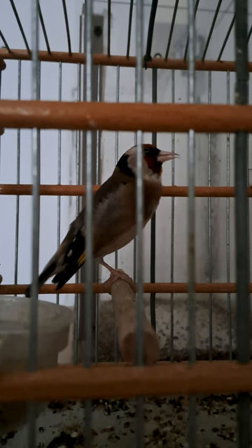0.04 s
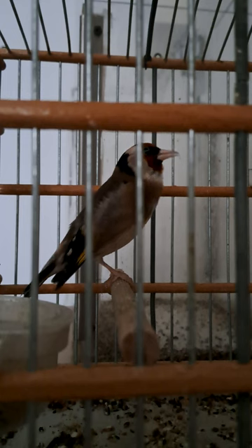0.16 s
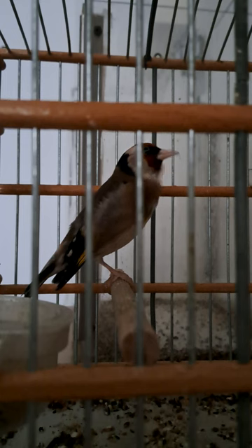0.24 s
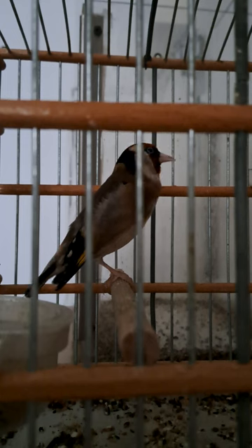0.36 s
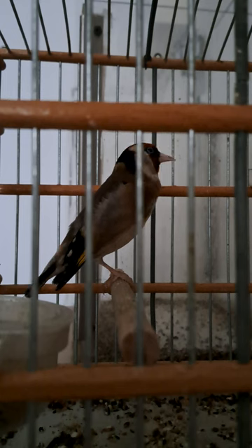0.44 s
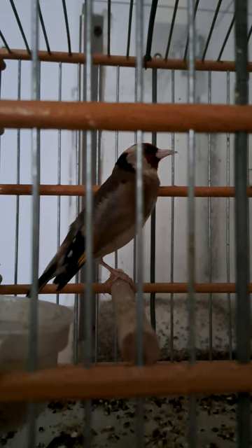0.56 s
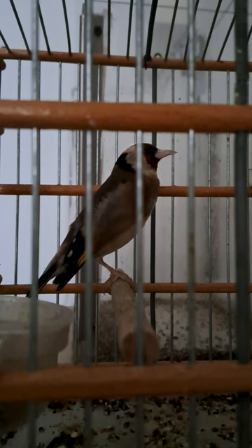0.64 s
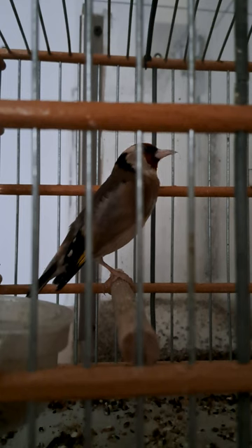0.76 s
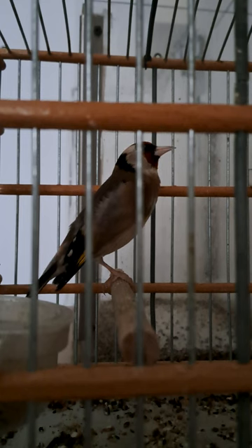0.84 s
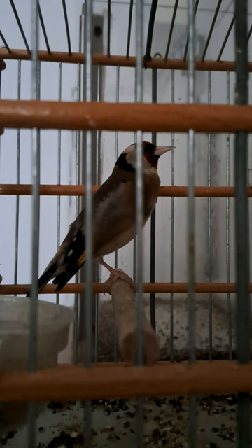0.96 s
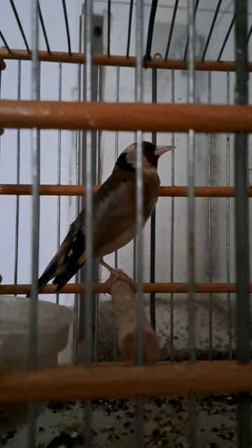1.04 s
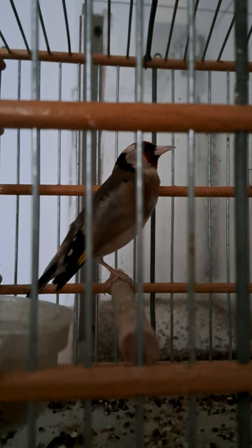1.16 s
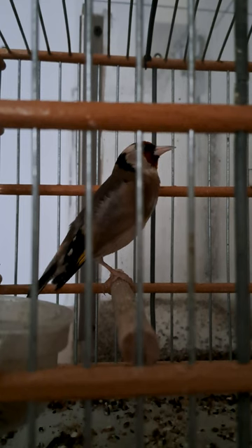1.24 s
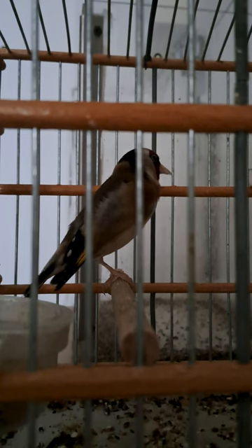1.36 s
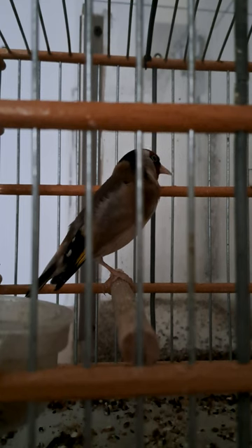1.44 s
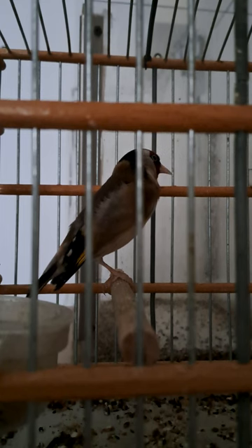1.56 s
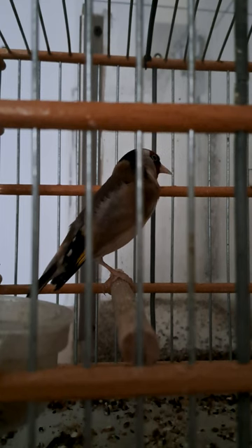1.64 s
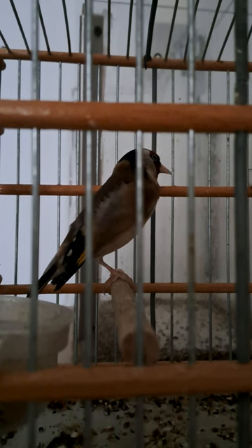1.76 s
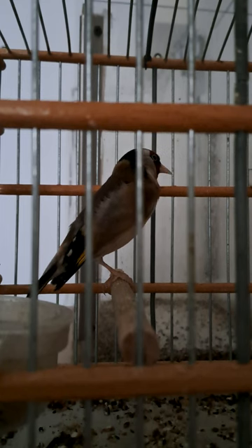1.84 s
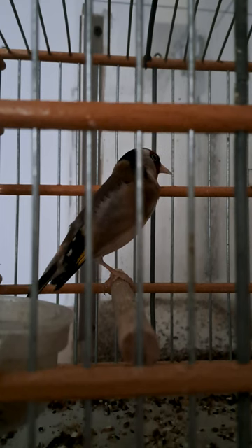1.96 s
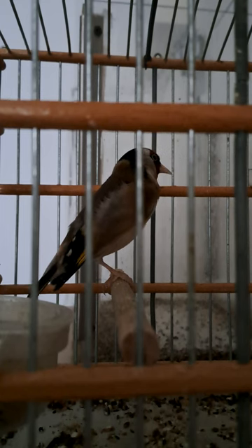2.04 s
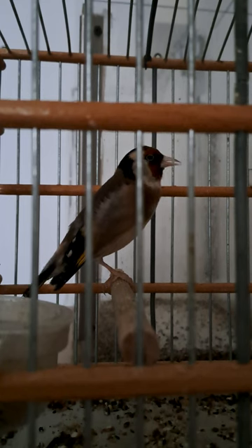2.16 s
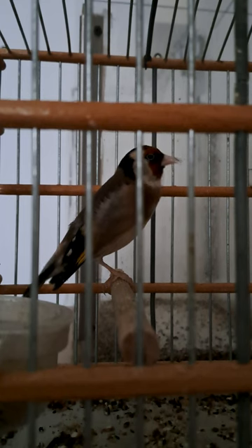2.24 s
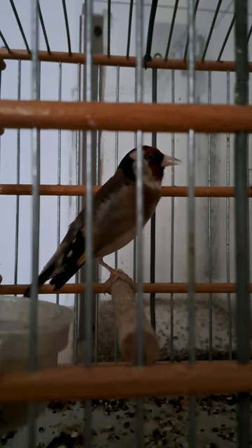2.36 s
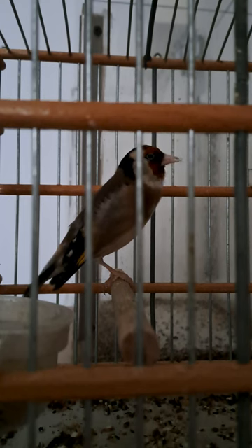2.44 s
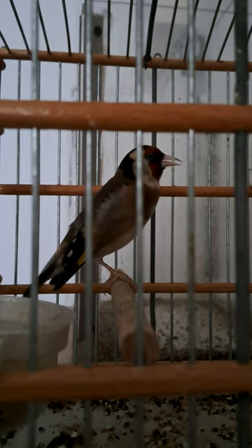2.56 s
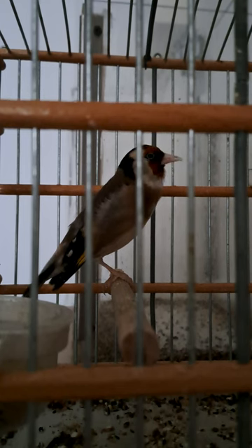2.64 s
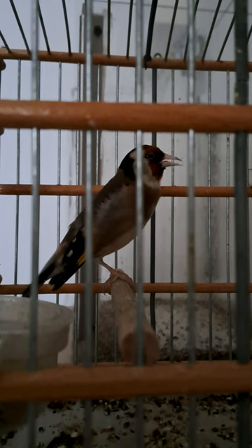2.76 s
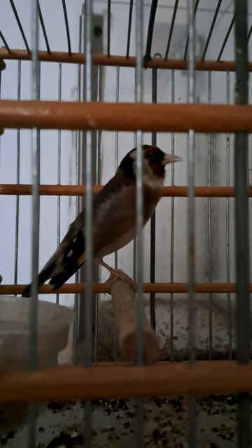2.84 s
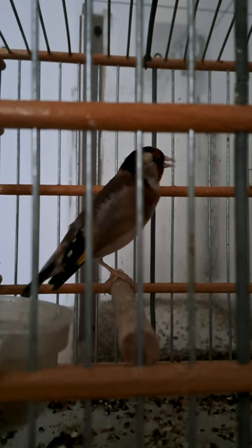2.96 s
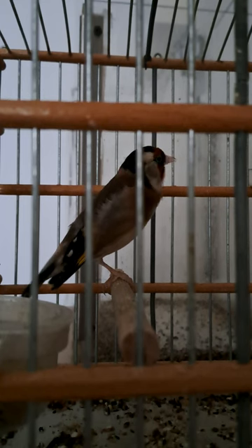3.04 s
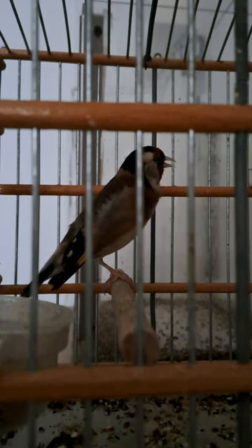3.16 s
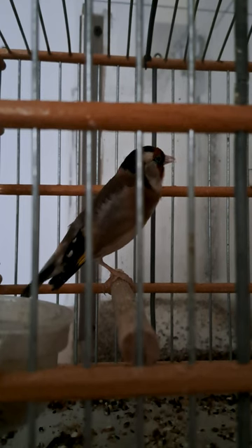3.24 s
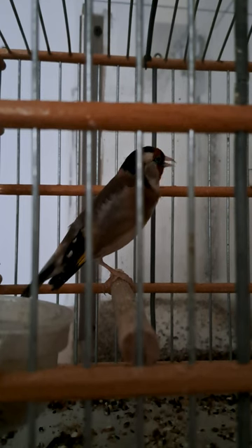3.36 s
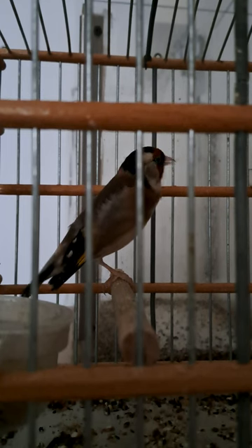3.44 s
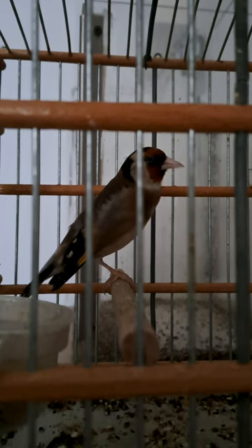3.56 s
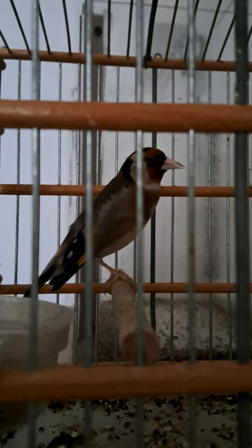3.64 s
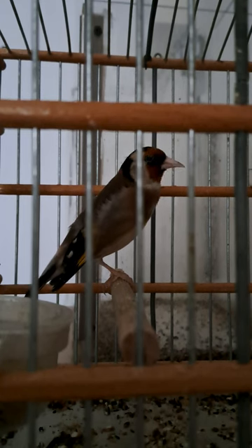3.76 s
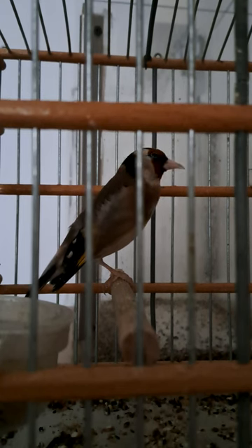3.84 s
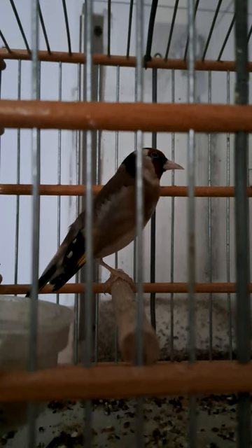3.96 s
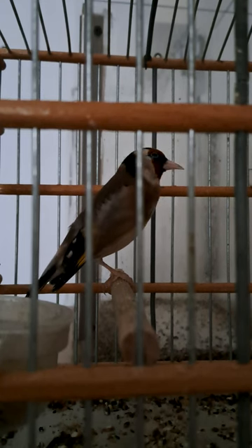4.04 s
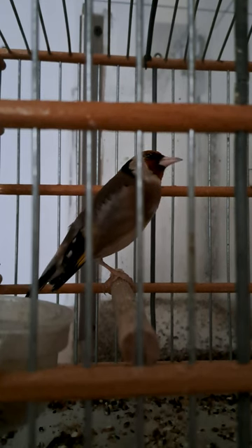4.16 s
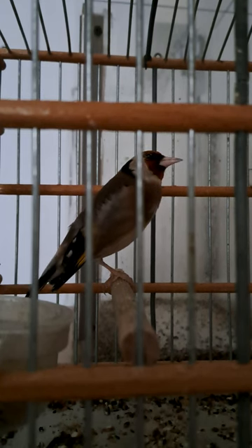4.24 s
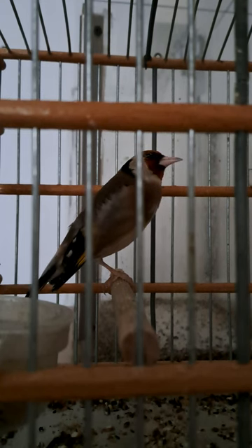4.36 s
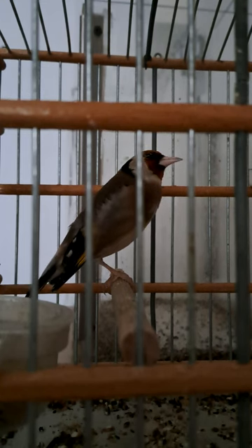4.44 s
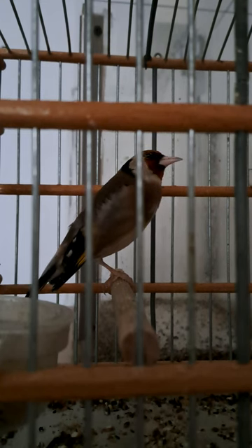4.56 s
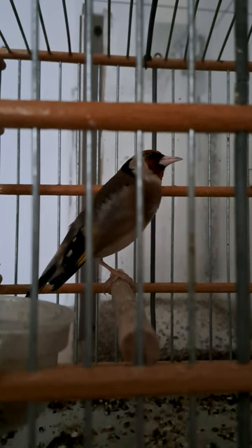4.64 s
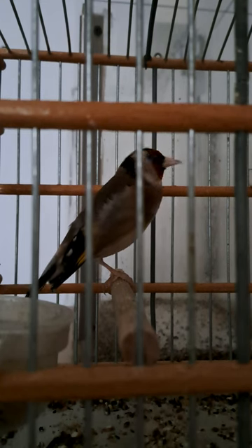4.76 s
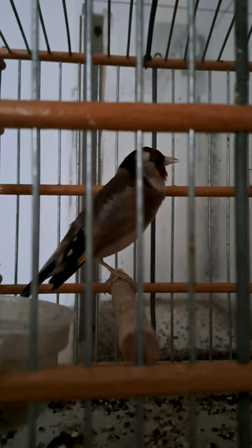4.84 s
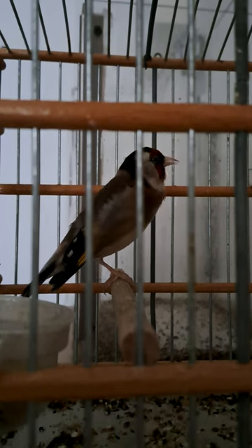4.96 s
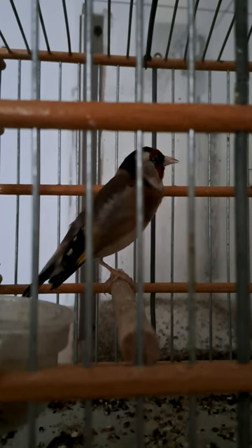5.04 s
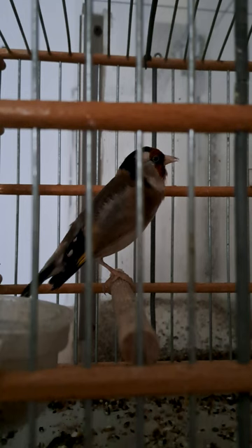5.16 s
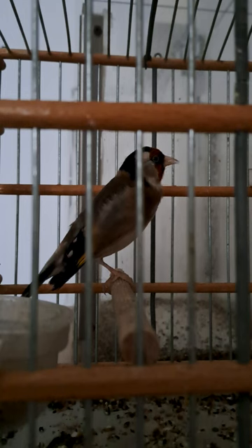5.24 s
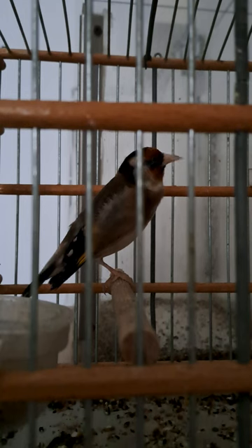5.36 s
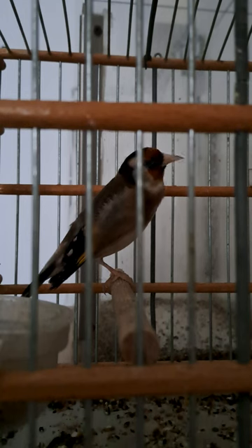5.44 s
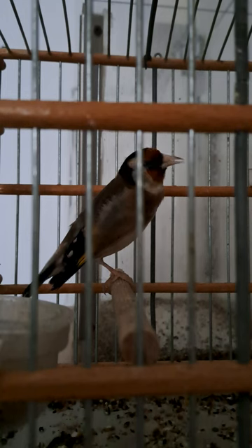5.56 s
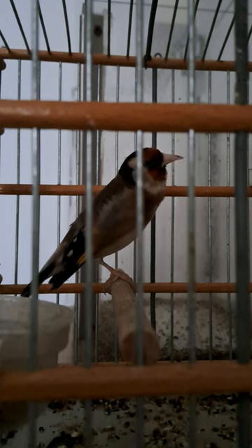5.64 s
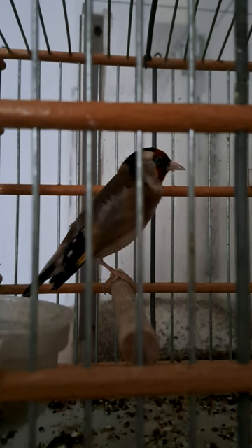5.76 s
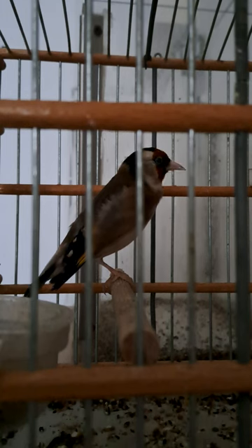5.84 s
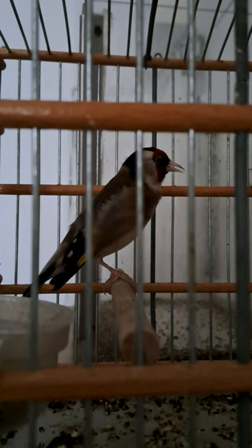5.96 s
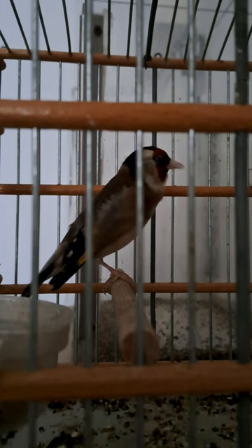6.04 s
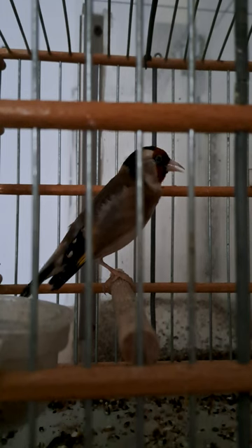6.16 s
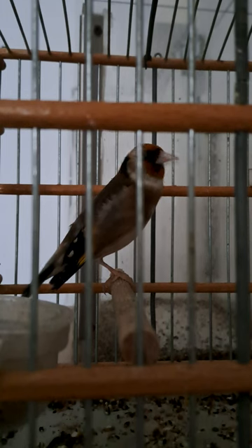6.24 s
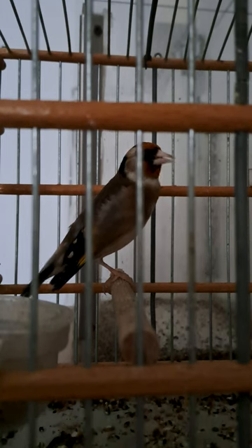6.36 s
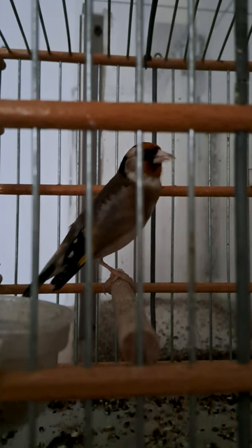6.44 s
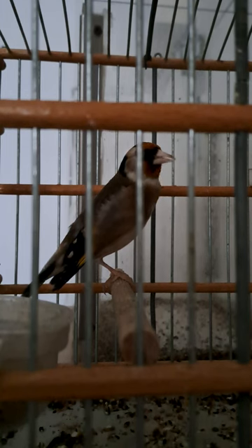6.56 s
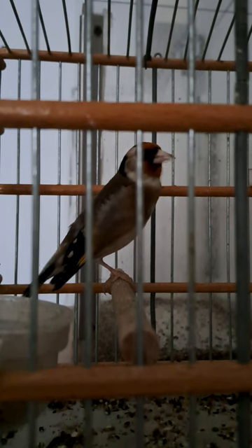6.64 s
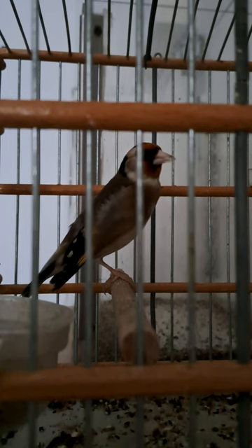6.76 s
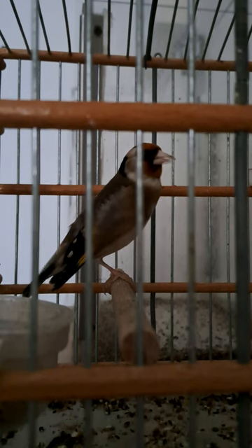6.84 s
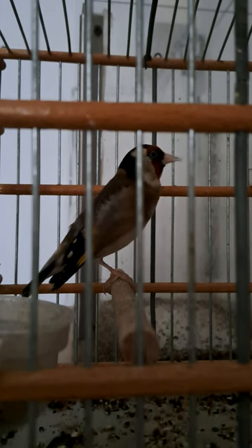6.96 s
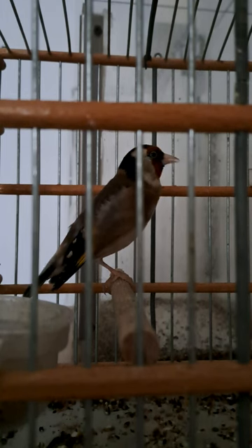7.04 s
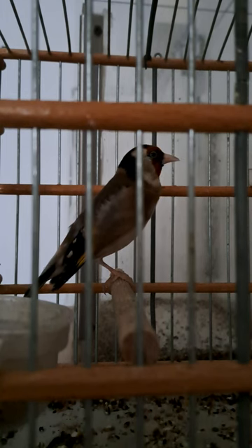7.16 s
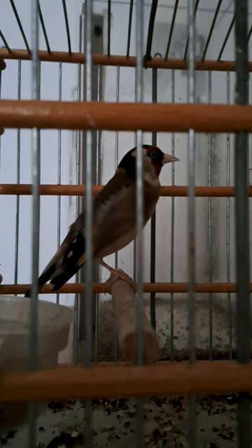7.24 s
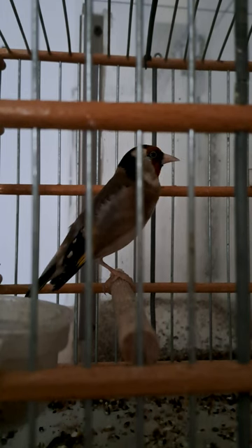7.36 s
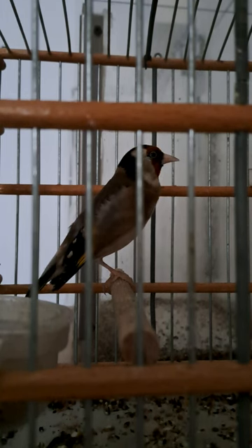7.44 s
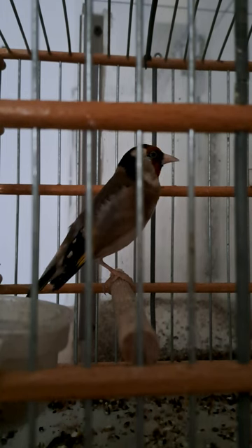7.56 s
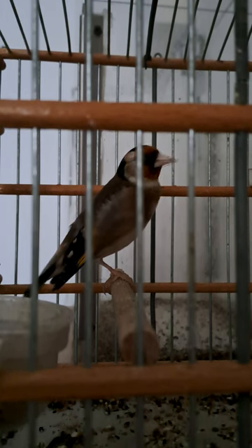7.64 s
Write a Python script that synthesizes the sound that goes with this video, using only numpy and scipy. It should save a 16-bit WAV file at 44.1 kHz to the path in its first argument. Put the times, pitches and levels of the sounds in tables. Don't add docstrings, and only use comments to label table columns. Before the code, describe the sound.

A small goldfinch in a cage sings close to a stereo microphone in a hard, echoing room. Two quick twittering syllables open, then a pause with a faint call, a loud rising call and a fast high-low trill ending in a thin squeak. After another pause the pattern returns more compactly, with distant scuffing and a knock underneath.

```python
import sys
import numpy as np
from scipy import signal
from scipy.fft import rfft, irfft
from scipy.io import wavfile
from scipy.ndimage import uniform_filter1d, minimum_filter1d, map_coordinates

SR = 44100
rng = np.random.default_rng(int(sys.argv[2]) if len(sys.argv) > 2 else 0)


def volts(x):
    e = np.asarray(x, float) / 20
    return 10 ** e


def wav_out(sig):
    wavfile.write(sys.argv[1], SR, np.round(np.clip(np.atleast_2d(sig).T, -1, 1) * 32767).astype(np.int16))


N = 340008
PRE = SR // 5
LAG = 7


def score():
    # [s, Hz, dB, dB, dB]
    openers = [
        (-.065, 3290, -3, -25, -16.5),
        (.255, 3314, 1, -19.5, -15.5),
        (4.901, 3314, 2, -26.5, -18.5),
        (5.233, 3299, 0.5, -18.5, -17),
    ]
    # [s, Hz, dB, dB, dB]
    twits = [(0.063, 5183, 0, -29, -6), (.371, 5278, 0, -32, -8), (5.016, 5213, -1.2987, -30.5, -6.5),
             (5.344, 5200, 2, -34, -9.5)]
    # [s, Hz, dB, dB, dB]
    chirps = [(2.367, 6105, -1.1, -14, -9.5), (2.532, 6092, 1.5, -16, -18)]
    # [s, Hz, dB, dB, dB]
    trill_top = [(2.641, 5032, -1, -16, -5.5), (2.844, 5033, -1.5, -13, -5.5),
                 (3.044, 5018, 2.2814, -15.5, -6.5), (3.245, 5009, 2, -15.5, -7.5),
                 (3.449, 4976, 4.5, -18, -9), (6.045, 5065, -2.2752, -17, -7),
                 (6.251, 5007, 1.8087, -18, -8), (6.455, 5010, -2, -14, -7),
                 (6.661, 4919, -3.0649, -13.5, -7), (6.865, 4947, -2.5, -15, -7)]
    # [s, Hz, dB, dB, dB]
    trill_bottom = [(2.746, 4242, -0.41, -12.5, -4), (2.945, 4248, -1.2, -11.5, -5),
                    (3.148, 4195, 1.7, -12.5, -8), (3.348, 4155, 1.5, -14, -9.5),
                    (5.74, 4218, 0.94, -17, -11.5), (6.147, 4254, 0.58, -15.5, -10.5),
                    (6.352, 4234, 1.3, -13, -9.5), (6.557, 4193, 1.5, -15.5, -12),
                    (6.762, 4180, 0.43, -14, -10.5)]
    # [s, Hz, dB, dB, dB]
    closers = [
        (3.568, 3934, 0, -25.5, -12.5),
        (6.977, 3949, 0.00095, -26.5, -14.5),
    ]
    # [s, Hz, dB, dB, dB]
    shrieks = [
        (3.673, 7147, .7, -15.5, -21.5),
        (7.08, 7331, -.7, -15.5, -21),
    ]
    # [s, Hz, dB, dB, dB]
    wisps = [
        (1.385, 4363, 0.0038, -34.5, -19.5),
        (2.2, 4417, 0.000536, -29, -20.5),
        (5.58, 4314, 0, -22.5, -16),
    ]
    # [s, Hz, dB, dB, dB]
    rings = [
        (2.243, 5296, 0, -32, -7.5),
        (5.623, 5230, 0.33, -28.5, -4),
    ]
    # [s, Hz, dB, dB]
    undertones = [(.085, 2113, 0, -47), (.395, 2132, -0.5, -44), (2.575, 2282, 3, -39),
                  (5.035, 2092, -2, -44.5), (5.365, 2074, -1, -49.5)]
    # [s, Hz, dB, dB]
    drops = [(.107, 4057, -2.012, -8), (.418, 4028, -0.982, -9.5), (5.062, 4034, 1.756, -10),
             (5.392, 4042, -1.795, -9.5)]
    return [
        (("lead", "buzz"), .033, openers),
        (("tick", "pip"), 0.017183, twits),
        (("drop",), 0, drops),
        (("under",), 0, undertones),
        (("fall", "step"), .036, wisps),
        (("twin", "lift"), 0.0036, [(1.429, 5206, 0.013, -27.5, -20.5)]),
        (("twin", "rise"), 0.0011, rings),
        (("buzz", "flick"), .043, chirps),
        (("mid",), 0, [(2.441, 4139, -1.5, -14.5)]),
        (("dip",), 0, [(2.463, 4773, 3.379, -10.5)]),
        (("high", "dip"), .039, trill_top),
        (("low", "mid"), .037, trill_bottom),
        (("sag", "climb"), .036, closers),
        (("shriek", "squeal"), 0.0038, shrieks),
    ]


def finch():
    # start pitch in Hz, usual final pitch in Hz, glide and length in seconds.
    slides = dict(lead=(3700, 4550, 0.0047, 0.021), buzz=(2694.8, 3300, .02, 0.038631),
              tick=(6550, 6450, 0.01, 0.025), pip=(5400, 5230, 0.021, 0.030847),
              drop=(3850, 4040, 0.0049, 0.021773), fall=(8700, 6248.3, .028, 0.04),
              step=(3850, 4300, 0.015, 0.017), rise=(4500, 5250, 0.025, .074),
              lift=(4600, 5200, .025, .048), twin=(3600, 3328.6, 0.011, 0.018),
              flick=(4950, 5770, .01, 0.025), high=(6700, 6410.1, .034, .034),
              dip=(6287.1, 5050, .017, 0.036445), low=(2697.5, 3280, .012, 0.03),
              mid=(3829.2, 4200, .013, 0.025107), sag=(3450, 2650, .018, .022),
              climb=(2800, 4000, .03, .034), shriek=(4750, 5850, 0.02, 0.03),
              squeal=(4700, 7200, 0.011, 0.033), under=(2200, 1500, 0.020444, 0.034))
    # rise and fall as shares of length, left-right in dB, room send in dB.
    throws = dict(lead=(.5, .5, -6.5, 4), buzz=(0.46494, 0.1455, -2.2, 0.9078),
              tick=(0.3915, 1.0115, -12, 1.0081), pip=(.5, 0.2318, -7.5, -1),
              drop=(0.355, 0.7747, -3.5, 2.5), fall=(0.7775, 0.6748, -9.5, 1.5),
              step=(.5, 0.2812, -6.5, 4.5), rise=(0.6511, 0.495, -9.5, -4),
              lift=(0.4144, 0.069, -11.5, 8.5), twin=(0.25, 0.46, 5.1, 2.3),
              flick=(0.6448, 0.5841, -15.5, -1), high=(1.1868, 0.3717, -14, 2), dip=(0.4099, 0.4567, -8, 0),
              low=(0.9106, 0.4554, -4.4, 1), mid=(0.6403, 0.5857, -8.5, 0.5094), sag=(.3, .4, 3, 4.2),
              climb=(0.9809, 0.613, -4.5, 3), shriek=(0.632, .5, -13.5, 3), squeal=(1.0309, 1, -7, 8.5),
              under=(0.8918, 1.5453, -1.5, 2))
    flutters = dict(lead=.03, buzz=.085, tick=.04, pip=.03, drop=.03, fall=.12, step=.32, rise=.07, lift=.08, twin=.35, flick=.2, high=.06, dip=.1, low=.055, mid=.065, sag=.15, climb=.1, shriek=.6, squeal=.55, under=.25)
    # octave, twelfth and air levels in dB.
    tones = dict(lead=(-25, -38.5, -55), buzz=(-27, -31.5, -45), tick=(-27.5, -50, -51.5),
             pip=(-32.5, -41, -42.5), drop=(-27, -34.5, -50), fall=(-21.5, -51.5, -38),
             step=(-28.5, -41.5, -28.5), rise=(-33, -44.5, -33), lift=(-34, -44, -35.5),
             twin=(-28, -40.5, -16), flick=(-31.5, -50.5, -42), high=(-24, -50, -44), dip=(-29.5, -38, -43),
             low=(-29, -35.5, -45.5), mid=(-29, -39, -44.5), sag=(-30.5, -35, -24.5),
             climb=(-26.5, -30.5, -41.5), shriek=(-24.5, -50.5, -35.5), squeal=(-28.5, -50.5, -35.5),
             under=(-41, -49.5, -32.5))
    room_per_turn = 0.5

    out = np.zeros((3, N + PRE + SR))
    for kinds, gap_s, rows in score():
        for start_s, final_hz, turn_db, *peaks_db in rows:
            tuning = final_hz / slides[kinds[-1]][1]
            for k, (kind, peak_db) in enumerate(zip(kinds, peaks_db)):
                start_hz, end_hz, glide_s, length_s = slides[kind]
                rise, fall, pan_db, room_db = throws[kind]
                note = volts(peak_db) * whistle(length_s, tuning * end_hz, tuning * start_hz, glide_s,
                                              rise, fall, flutters[kind], *tones[kind])
                half_pan_db = (pan_db - turn_db) / 2
                sends = volts([[half_pan_db], [-half_pan_db], [room_db + room_per_turn * turn_db]])
                first = PRE + round((start_s + k * gap_s) * SR)
                out[:, first:first + len(note)] += sends * note
    return np.array([out[0], np.roll(out[1], LAG)]), out[2]


def whistle(length_s, end_hz, start_hz, glide_s, rise, fall, flutter, octave_db, twelfth_db, air_db):
    t = np.arange(int(length_s * SR)) / SR
    knots = rng.standard_normal((2, 90))
    hiss = np.diff(rng.standard_normal(SR // 10))
    bend, shake = (map_coordinates(k, [t * 600]) for k in knots)

    sliding = np.clip(1 - t / glide_s, 0, 1)
    unsteady_hz = 400 * flutter * (1 + 1.2 * sliding) * bend
    hz = end_hz + (start_hz - end_hz) * sliding ** 1.6 + unsteady_hz
    phase = 2 * np.pi * np.cumsum(hz) / SR

    opening = np.sin(np.pi / 2 * np.clip(t / length_s / rise, 0, 1))
    closing = np.sin(np.pi / 2 * np.clip((1 - t / length_s) / fall, 0, 1))
    swell = (opening * closing) ** 1.1801

    octave = np.sin(2 * phase)
    twelfth = (3 * hz < SR / 2) * np.sin(3 * phase) + (hz < 3700) * np.sin(4 * phase)
    over = (1 + 2.5 * flutter * shake) * (volts(octave_db) * octave + volts(twelfth_db) * twelfth)
    air = volts(air_db) * (.2 + np.sin(np.pi * sliding)) * hiss[:len(t)]
    return swell * ((1 + flutter * shake) * np.sin(phase) + over + air)


def room(x):
    # frequency in Hz, t60 in seconds.
    decay = [(2000, 1.2), (3200, 1.1669), (4200, 1.0524), (5200, 0.99207), (7000, 0.79), (10000, .62),
             (15000, .4)]
    # delay in seconds, left level in dB, right level in dB.
    walls = [
        (.005, -10.5, -10),
        (.013, -6, -7.5),
        (0.031, -18, -9),
        (0.061, -17, -13.5),
    ]
    alike, build_s, smear_s = 0.29, 0.0023, 0.005

    a, b = rng.standard_normal((2, 2 * SR))
    pair = [alike * a + np.sqrt(1 - alike ** 2) * b, np.roll(a, LAG)]
    hz, t, z = signal.stft(pair, SR, nperseg=256)
    f, t60_s = np.transpose(decay)
    fade = volts(-60 * t / np.interp(hz, f, t60_s)[:, None])
    tail = signal.istft(z * fade, SR, nperseg=256)[1]
    t = np.arange(tail.shape[1]) / SR
    tail *= 1 - np.exp(-t / build_s)
    tail *= volts([[-11.5], [-6.5]]) / np.linalg.norm(tail[0])

    for delay_s, left_db, right_db in walls:
        spread = (t > delay_s) * np.exp(-abs(t - delay_s) / smear_s)
        scatter = rng.standard_normal(tail.shape) * spread
        tail += volts([[left_db], [right_db]]) * scatter / np.linalg.norm(scatter[0])
    return signal.fftconvolve(x[None], tail, axes=1)


def shuffle_click_and_knocks():
    # peak in seconds, level in dB, seconds to grow and to fade by 60 dB.
    scuffs = [
        (5.55, -63, .2, 1.2),
        (5.7, -56, .4, 1.7),
        (5.86, -58, .8, .9),
        (6.26, -56, .14, 2),
        (6.44, -60, .6, .4),
        (6.83, -62, 1.2, 2.5),
        (7.25, -68, 2, 3.5),
    ]
    # peak in seconds, level in dB, seconds to grow and to fade by 60
    # dB.
    click_and_knocks = [
        (.001, -63, 0.007041, 0.02578),
        (4.96, -76.5, 1.1727, 1.673),
        (5.63, -49.5, 0.1237, 0.16),
        (6.27, -65.5, .25, 0.927),
    ]
    # frequency in Hz, level in dB.
    scuff_colour = [(500, -42.5), (850, -12.5), (915, -17.5), (1150, -2.5), (1260, -6.5), (1490, -8.5),
                    (1990, 0), (2400, -6), (3120, -28), (5280, -120)]
    # frequency in Hz, level in dB.
    thud_colour = [(71, -35.5), (120, -5.5), (293, -6), (336, -14), (383, -5), (505, -5.5), (950, -1),
                   (1240, -30), (2090, -120)]

    shuffle = swells(scuffs) * volts(1.5 * wobble(7))
    thud = volts(-92) + swells(click_and_knocks) + volts(-15) * shuffle
    scuffing = volts(3.0) * shuffle * noise(lambda f: colour(scuff_colour, f), -0.15)
    return scuffing + thud * noise(lambda f: colour(thud_colour, f), .86)


def whine():
    # peak in seconds, level in dB, seconds to grow and to fade by 60 dB.
    surges = [
        (3.55, -83.5, 0.652, 1.3),
        (3.97, -78.5, .6, 0.6885),
        (4.416, -72.5, 0.2847, 0.3846),
        (4.8, -61, 0.23, 0.55),
        (4.99, -67, .8, 1),
    ]
    t = np.arange(N) / SR
    tone = [[1.6], [-.5]] * np.sin(2 * np.pi * 955 * t)
    return swells(surges) * (0.55 * noise(resonance(955, 15.278), -.3) + tone)


def hum():
    # peak in seconds, level in dB, seconds to grow and to fade by 60 dB.
    passes = [
        (1.85, -72.5, 0.58, 3.7),
        (2.44, -73, 3, 1.8),
    ]
    t = np.arange(N) / SR
    lows = volts(-7.5) * noise(resonance(260, 160), 0.9472)
    narrow = .6 * noise(resonance(156, 5), 0.86)
    return swells(passes) * (lows + narrow + 1.3 * np.sin(2 * np.pi * 156 * t))


def rumble():
    # peak in seconds, level in dB, seconds to grow and to fade by 60 dB.
    bumps = [
        (.08, -77, 4, 0.01),
        (.55, -77, 2, 2),
        (1.19, -64.5, 0.1439, 0.6423),
        (1.76, -60, .5, 0.9233),
        (2.4, -83, 0.5, 4.5),
        (5.4, -78, 3.5, 4),
        (6.76, -74.5, 0.7135, 1.5),
    ]
    # frequency in Hz, level in dB.
    rumble_colour = [(12, -49.5), (20, -21.5), (57, -3), (70, 1), (88, 0), (130, -19), (200, -18.5),
                     (260, -52), (440, -120)]
    level = (volts(-90.5) + swells(bumps)) * volts(1.8 * wobble(3.4))
    return level * noise(lambda f: colour(rumble_colour, f), .88)


def hiss():
    # frequency in Hz, level in dB.
    hiss_colour = [(60, -19), (150, 5.5), (300, -4), (700, -11), (2500, -11), (6000, -17.5), (8000, -23.5),
                   (12000, -18.5), (15500, -22)]
    return volts(-83) * noise(lambda f: colour(hiss_colour, f), .5)


def noise(response, alike):
    spectrum = rfft(rng.standard_normal((2, N))) * response(np.fft.rfftfreq(N, 1 / SR))
    a, b = irfft(spectrum, N)
    turn = np.arccos(np.clip(alike, -1, 1)) / 2
    common, apart = np.cos(turn) * a, np.sin(turn) * b
    pair = np.array([common + apart, common - apart])
    return pair / pair.std()


def resonance(centre_hz, width_hz):
    return lambda f: 1 / (1 + ((f - centre_hz) / width_hz) ** 2)


def swells(rows):
    t = np.arange(N) / SR
    return sum(volts(db - 60 * np.maximum((s - t) / grow_s, (t - s) / fade_s)) for s, db, grow_s, fade_s in rows)


def wobble(rate_hz):
    return map_coordinates(rng.standard_normal(200), [np.arange(N) * rate_hz / SR])


def colour(points, hz):
    f, db = np.transpose(points)
    return volts(np.interp(np.log(hz + 1), np.log(f + 1), db))


def tinted(x, points):
    return irfft(rfft(x, 2 * N) * colour(points, np.fft.rfftfreq(2 * N, 1 / SR)))[..., :N]


def scene():
    # frequency in Hz, level in dB.
    near_top = [(7500, 0), (10000, -0.2)]
    # frequency in Hz, level in dB.
    echo_top = [(7500, 0.1898), (10000, 1.5)]
    # frequency in Hz, level in dB.
    throat = [(1200, -9.5), (2300, -4.5), (2800, 0)]
    # frequency in Hz, level in dB.
    left_shadow = [(6500, 0.5), (12000, -8.5)]

    near, sent = finch()
    direct = tinted(near[:, PRE:PRE + N], near_top)
    echo = tinted(room(sent)[:, PRE:PRE + N], echo_top)
    left, right = tinted(direct + echo, throat)
    song = np.array([tinted(left, left_shadow), right])
    return song + shuffle_click_and_knocks() + whine() + hum() + rumble() + hiss()


def top_cut(x):
    return signal.sosfilt(signal.butter(12, 15840, fs=SR, output="sos"), x)


def record(dry):
    # frequency in Hz, level in dB.
    overall_colour = [(2000, 1), (7000, -1), (7500, -7.5), (7900, -23.5), (8600, -5.5), (9600, 0.5), (11500, 7.5),
                      (15000, -2)]
    # frequency in Hz, level in dB.
    bent = [(300, -77.5), (1200, -47.5), (2300, -34), (7000, -32), (10000, -27.5), (15000, -23)]
    top_hz = 15840

    hz = np.fft.rfftfreq(2 * N, 1 / SR)
    products = rfft(dry ** 2, 2 * N) * colour(bent, hz)
    spectrum = (rfft(dry, 2 * N) + products) * colour(overall_colour, hz) * (hz < top_hz)
    heard = irfft(spectrum)[:, :N]
    needed = minimum_filter1d(1 / np.maximum(abs(heard).max(axis=0), 1), size=441)
    return top_cut(heard * uniform_filter1d(needed, size=221))


dry = scene()
out = record(dry)
wav_out(out)
```